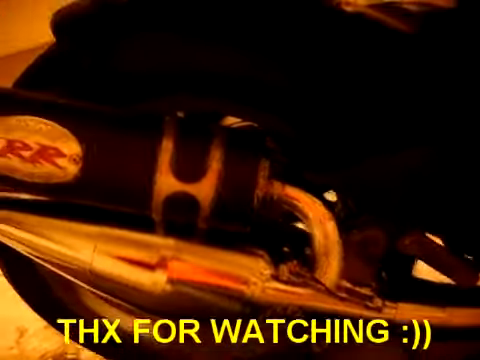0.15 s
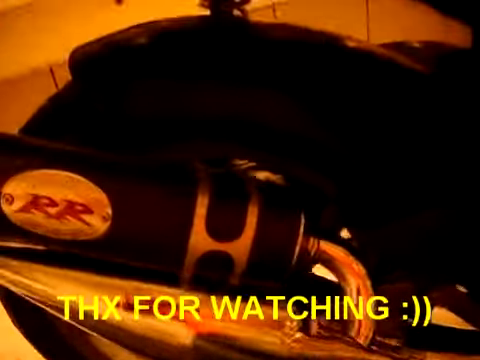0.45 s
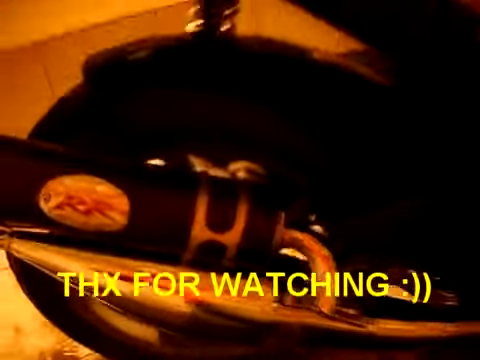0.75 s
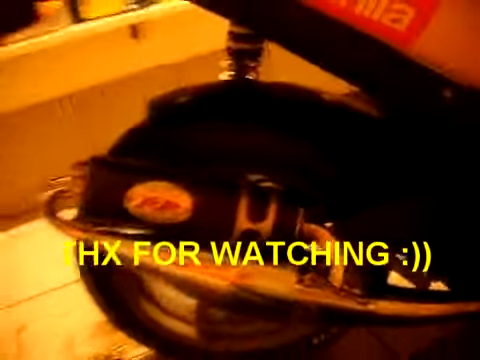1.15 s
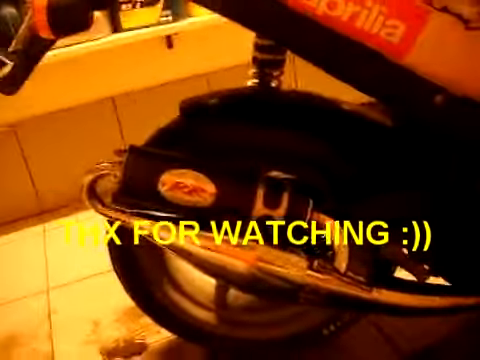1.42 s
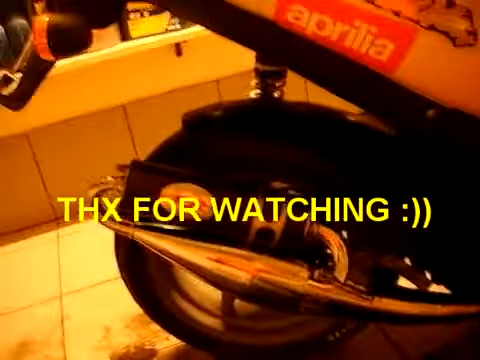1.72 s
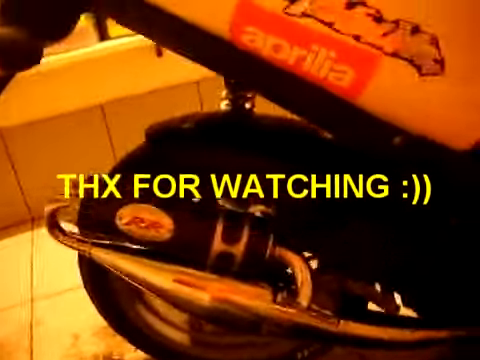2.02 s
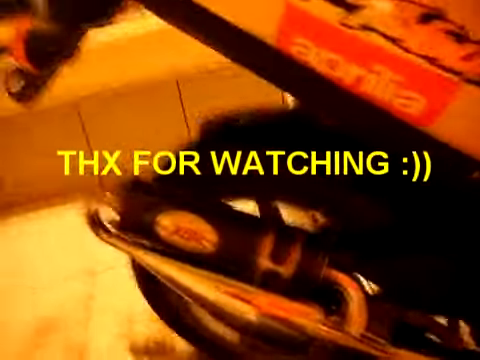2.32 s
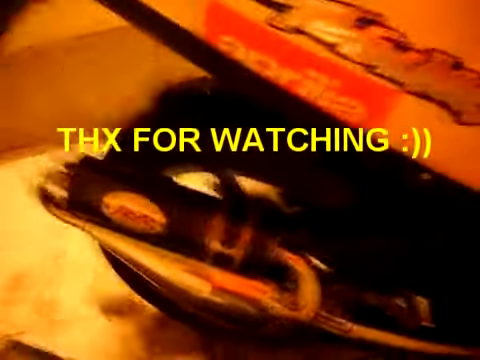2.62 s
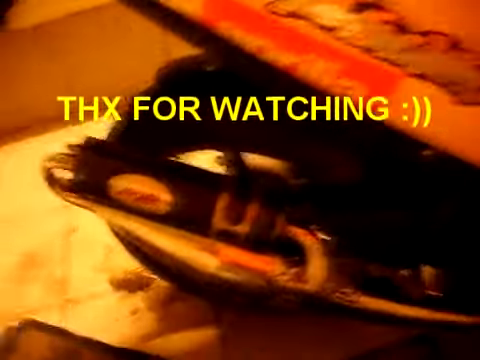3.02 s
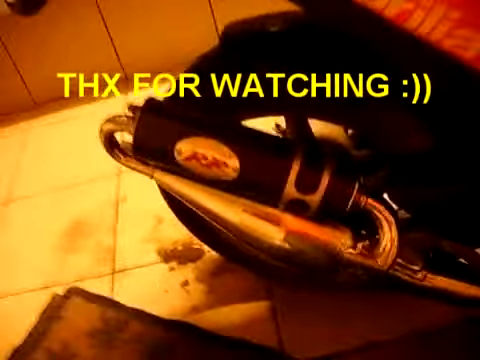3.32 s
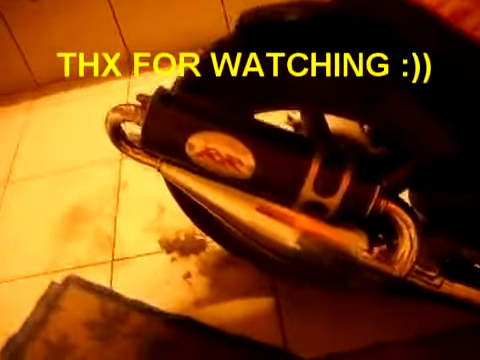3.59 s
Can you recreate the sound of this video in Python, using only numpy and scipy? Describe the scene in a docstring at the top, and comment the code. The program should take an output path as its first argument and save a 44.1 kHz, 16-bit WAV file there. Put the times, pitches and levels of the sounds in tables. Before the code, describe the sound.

A small two-stroke scooter drops from a short rev to an uneven idle, its exhaust popping and puffing with fine metal clatter, heard very close over a hard tiled floor with short reflections.

```python
"""Small scooter settling to idle

A small two-stroke scooter settles from a blip to a lumpy idle, close by, over a tiled floor.
Every turn of the crank puffs into the exhaust, ringing its pipe, but only every second to fourth turn
fires with a full pop. Filtered noise makes the gas that rumbles, rasps, hums and whistles in the silencer.
Dying sines make the piston's knocks and the ticks of loose metal; the loudest pops overload the microphone."""
import sys
import numpy as np
from scipy import signal
from scipy.io import wavfile
from scipy.ndimage import uniform_filter1d

SR = 44100
rng = np.random.default_rng(int(sys.argv[2]) if len(sys.argv) > 2 else 0)


def digitize_waveform(pressure):
    """Quantize a signal to 16-bit integers and store it at the path in sys.argv[1].

    Rows of a 2-D input are taken as channels; values are limited to [-1, 1].
    """
    field = np.atleast_2d(pressure).T
    bounded = np.clip(field, -1, 1)
    quanta = np.round(bounded * 32767).astype(np.int16)
    wavfile.write(sys.argv[1], SR, quanta)


N = 165375  # length in samples

# full firings of the engine: start_s [s], level_db [dB], turns_to_next [crank turns until the next firing]
FIRING_TIMES = [(0.0103, -8, 3), (0.0996, -2.5, 3), (0.1771, 4, 4), (0.2934, -0.5, 4), (0.4169, -1, 4),
                (0.5487, -1, 4), (0.6903, 2.5, 4), (0.8414, -5.5, 4), (0.9969, 1, 3), (1.1217, -8, 3),
                (1.2589, -8, 2), (1.3586, -2.5, 2), (1.4564, -2, 2), (1.5596, -5, 2), (1.6607, 3, 3),
                (1.8101, -3.5, 4), (2.0014, 1.5, 3), (2.152, -9, 2), (2.2436, -1, 2), (2.3403, -4.5, 3),
                (2.490, -0.5, 3), (2.6317, -1.5, 3), (2.7717, -3.5, 3), (2.9093, -5, 2), (3.0068, -1.5, 3),
                (3.1512, -7, 3), (3.2976, -9, 4), (3.4902, -2, 3), (3.6395, -0.5, 3), (3.788, -3, 1)]


def amp(db):
    """Turns decibels into a gain."""
    return 10 ** (np.asarray(db) / 20)


def unit(x):
    """Scales a sound to rms 1."""
    return x / np.sqrt(np.mean(x ** 2) + 1e-20)


def add(mix, s, sound):
    """Mixes a sound in at time s, in seconds."""
    at = round(s * SR)
    sound = sound[max(-at, 0):]
    part = mix[max(at, 0):][:len(sound)]
    part += sound[:len(part)]


def colour(x, points):
    """Gives a sound the wanted spectrum with a filter that never sounds early; the result has rms 1."""
    points_hz, points_db = np.transpose(points)
    size = 8192
    hz = abs(np.fft.fftfreq(size, 1 / SR))
    gain_db = np.interp(np.log(hz + 1), np.log(points_hz), points_db)
    # the Hilbert transform of the log gain gives the phase of a minimum-phase filter
    log_spectrum = signal.hilbert(np.log(amp(gain_db))).conj()
    taps = np.fft.ifft(np.exp(log_spectrum)).real[:size // 2]
    return unit(signal.fftconvolve(x, taps)[:N])


def resonate(x, hz, width_hz):
    """One resonance: each sample sets off a dying sine; the result has rms 1."""
    t = np.arange(SR // 2) / SR
    response = np.exp(-np.pi * width_hz * t) * np.sin(2 * np.pi * hz * t)
    return unit(signal.fftconvolve(x, response)[:N])


def ring(modes, scatter_db, detune, attack_s):
    """Struck metal or a pulsed pipe: dying sines, with level and pitch a little different each time."""
    t = np.arange(SR // 4) / SR
    onset = 1 - np.exp(-(t / attack_s) ** 2)
    out = np.zeros(len(t))
    for hz, db, t60_s in modes:
        size = amp(db + scatter_db * rng.standard_normal())
        decay = np.exp(-np.log(1000) * t / t60_s)
        pitch_hz = hz * (1 + detune * rng.standard_normal())
        out += size * decay * np.sin(2 * np.pi * pitch_hz * t)
    return onset * out


def bursts(turns, lead_s, rise_s, fall_s, base, scatter_db, fired_db, next_db):
    """One swell per turn over a steady base; the fired turn and the one after it have their own strength."""
    t, out = np.arange(N) / SR, np.zeros(N)
    for s, k in turns:
        near = slice(max(int(s * SR) - SR // 10, 0), int(s * SR) + SR // 10)
        since_peak = t[near] - s + lead_s
        size = amp(scatter_db * rng.standard_normal() + fired_db * (k == 0) + next_db * (k == 1))
        out[near] += size * np.exp(-np.maximum(-since_peak / rise_s, since_peak / fall_s))
    return out + base


def grains(per_s, spread_db):
    """Dense random clicks of uneven size, scaled to rms 1."""
    sizes = amp(spread_db * np.minimum(rng.exponential(1, N), 4))
    present = rng.random(N) < per_s / SR
    return unit(rng.standard_normal(N) * sizes * present)


def level(s, order):
    """Gain at time s, from one column of levels, as the engine slows and the microphone draws back."""
    # overall levels: start_s [s], puffs_db [dB], rasp_db [dB], clatter_db [dB]; puffs_db also sets the rumble
    rows = np.array([(0, 2, 7, 3.5), (0.252, 1, 6, 5.5), (0.55, 4.5, 7, 4), (0.721, 3, 4, 3),
                     (.87, 2, 4.5, 1), (1.2, -3, 1, -0.5), (1.43, -1, 4, -0.5), (1.601, -2.5, 1, 0),
                     (2.099, -1, 2.5, 1.5), (2.652, -3.5, 2, -0.5), (3.202, -2.5, 1, 1.5), (3.75, -3, 1, 1)])
    return amp(np.interp(s, rows[:, 0], rows[:, order]))


def crank():
    """Lists every crank turn before the last firing as (s, turns since a firing), spaced almost evenly."""
    jitter_s = .0002
    turns = []
    for (start, _, count), (end, _, _) in zip(FIRING_TIMES, FIRING_TIMES[1:]):
        count = int(round(count))
        for k in range(count):
            jitter = (k > 0) * jitter_s * rng.standard_normal()  # the firings stay exactly in place
            turns.append((start + (end - start) * k / count + jitter, k))
    return turns


def exhaust(turns):
    """A pressure pulse rings the pipe: a full pop at a firing, else a puff, stronger just after a firing."""
    # ways the exhaust pipe rings: pitch_hz [Hz], firing_db [dB], puff_db [dB], t60_s [s to fall by 60 dB]
    pipe = np.array([(46, -31, -42, 0.034), (72.9, -25, -36, 0.74), (109.46, -27, -17.5, 0.28),
                     (131.24, -14.5, -23.5, 0.35), (154, -12, -29, 0.07), (243.5, -27.5, -36.5, 0.28),
                     (360, -36, -41.5, 0.059)])
    pop_modes, puff_modes = pipe[:, [0, 1, 3]], pipe[:, [0, 2, 3]]
    lead_s, rise_s, scatter_db, after_firing_db = 0.002, 0.00083, 1, 1.5
    out = np.zeros(N)
    for s, db, _ in FIRING_TIMES:
        pop = ring(pop_modes, scatter_db, detune=0.0027, attack_s=rise_s)
        add(out, s - lead_s, -amp(db) * pop)
    for s, k in turns:
        if k:
            puff = ring(puff_modes, scatter_db, detune=0.016, attack_s=rise_s)
            add(out, s - lead_s, -level(s, order=1) * amp(after_firing_db * (k == 1)) * puff)
    return out


def gas(turns):
    """Turbulent gas leaves in gusts: a rumble, a rasp, and the silencer's hum and whistle."""
    gust = bursts(turns, lead_s=0.00067, rise_s=0.014, fall_s=0.021, base=0.99,
                  scatter_db=1, fired_db=5.0, next_db=5.0)
    return gas_rumble(gust) + gas_rasp(turns, gust) + silencer_hum(gust) + silencer_whistle(turns)


def gas_rumble(gust):
    """The low roar of the flow: noise that swells with the gusts."""
    # spectrum of the rumble: pitch_hz [Hz], level_db [dB per Hz]
    spectrum = [(10, -13.5), (30, -9.5), (55, -12.5), (85, -11), (108, 5), (130, 5.5), (165, -1.5),
                (300, -7), (400, -14.5), (520, -19.5), (5000, -90)]
    rumble = colour(rng.standard_normal(N) * gust, spectrum) * amp(-21.5)
    return rumble * level(np.arange(N) / SR, order=1)


def gas_rasp(turns, gust):
    """The rough edge of the flow: random grains mixed with chuffs that repeat on every turn."""
    # spectrum of the rasp: pitch_hz [Hz], level_db [dB per Hz]
    spectrum = [(200, -5), (400, -2.5), (530, 0), (600, 3.5), (740, 5.5), (820, -3), (1180, 0),
                (1400, -4.5), (1600, -12), (1780, -10.5), (2100, -19.5), (4000, -24.5), (8500, -60)]
    t = np.arange(N) / SR
    revving, idle, settled_s = 1.0, 0.32, .9
    regular = np.interp(t, [0, settled_s], [revving, idle])  # the rasp is more regular at speed
    rough = unit(grains(per_s=5600, spread_db=2.0) * gust)
    mixed = (rough + regular * chuffs(turns)) / np.hypot(1, regular)
    return colour(mixed, spectrum) * amp(-35) * amp(-0.5) * level(t, order=2)


def chuffs(turns, lead_s=0.0037, fall_s=0.013, fired_db=3):
    """The opening port sends the same scatter of echoes through the baffles on every turn."""
    t, out = np.arange(SR // 20) / SR, np.zeros(N)
    baffles = rng.standard_normal(len(t)) * np.exp(-t / fall_s)
    for s, k in turns:
        add(out, s - lead_s, amp(fired_db * (k == 0) + rng.standard_normal()) * baffles)
    return unit(out)


def silencer_hum(gust):
    """The gusting flow blows two resonances of the silencer, each with its own slow swell."""
    # the silencer's resonances: pitch_hz [Hz], width_hz [Hz], level_db [dB before the swell]
    resonances = [(249.4, 10, -32.5), (330, 27, -40.5)]
    # swell of the hum: start_s [s], low_tone_db [dB], high_tone_db [dB]
    hum_swell = [(0, -4, 10.5), (0.381, 7.5, 8.5), (0.461, 14.5, 11), (.56, 13, -16), (.64, 0.5, 4),
                 (1.801, 0.5, 2.5), (2.6, -3, 11.5), (3.2, 9, 9.5), (3.75, 1.5, 13.5)]
    t = np.arange(N) / SR
    flow = rng.standard_normal(N) * gust
    times, *swells = np.transpose(hum_swell)
    hum = np.zeros(N)
    for (hz, width_hz, db), swell in zip(resonances, swells):
        hum += amp(db + np.interp(t, times, swell)) * resonate(flow, hz, width_hz)
    return hum


def silencer_whistle(turns):
    """A wavering tone blown in the silencer surges on every turn."""
    # level of the whistle: start_s [s], level_db [dB]
    whistle_level = [(0, -31), (.32, -30), (.37, -41), (.9, -34), (1.5, -48.5), (2.55, -35.5), (3.2, -40),
                     (3.75, -39)]
    surge = bursts(turns, lead_s=0, rise_s=.008, fall_s=.025, base=.1, scatter_db=4, fired_db=3, next_db=0)
    level_db = np.interp(np.arange(N) / SR, *np.transpose(whistle_level))
    return unit(tone(hz=664) * surge) * amp(level_db)


def tone(hz):
    """A blown resonance: a sine that wavers a little in pitch."""
    wander_hz, wander_s = 13, .012  # rms size of the wavering, and the time it is smoothed over
    count = int(wander_s * SR)
    smooth = uniform_filter1d(uniform_filter1d(rng.standard_normal(N), count), count)
    return np.sin(2 * np.pi * np.cumsum(hz + wander_hz * unit(smooth)) / SR)


def clatter(turns):
    """Moving parts rattle finely on every turn: dense grains that swell with the shaking."""
    # spectrum of the clatter: pitch_hz [Hz], level_db [dB per Hz]
    spectrum = [(700, -8.5), (1500, 0), (2250, 5), (2600, 10.5), (3000, 5.5), (3350, -1.5), (4100, -14),
                (4950, -5.5), (5450, -22), (6200, -15), (6800, -26.5), (7700, -31.5), (8400, -27.5)]
    shake = bursts(turns, lead_s=0.014, rise_s=0.00081, fall_s=0.032, base=0.24,
                   scatter_db=0, fired_db=5.0, next_db=3)
    rattle = colour(grains(per_s=2500, spread_db=1.5) * shake, spectrum) * amp(-46)
    return rattle * level(np.arange(N) / SR, order=3)


def spit(turns):
    """A sharp burst of crackling grains on the turn after each firing."""
    # spectrum of the spit: pitch_hz [Hz], level_db [dB per Hz]
    spectrum = [(400, 3), (1300, 24.5), (2100, 5), (3000, 9), (4600, -0.5), (5500, -14), (6400, -12.5),
                (7200, -21), (8400, -24)]
    after = [(s, k) for s, k in turns if k == 1]
    jet = bursts(after, lead_s=0.0014, rise_s=.002, fall_s=0.0075, base=0,
                 scatter_db=1, fired_db=0, next_db=0)
    crackle = grains(per_s=5000, spread_db=1)
    return colour(crackle * jet, spectrum) * amp(-46)


def metal(turns):
    """The piston rings the cylinder with a soft knock around 16 ms before each puff, and sometimes a hard one."""
    # hard piston knocks: start_s [s], level_db [dB before the gain below]
    hard_knocks = [(0.063, -25), (0.173, -27), (0.2867, -26.5), (0.414, -26), (0.5035, -28.5),
                   (0.826, -21.5), (0.9851, -24), (1.2448, -25), (1.398, -23.5), (1.7388, -28),
                   (1.7958, -19), (1.8906, -25), (2.2254, -26.5), (2.325, -28.5), (2.9973, -24),
                   (3.0858, -29.5), (3.1797, -27), (3.2268, -27.5), (3.283, -26), (3.474, -27),
                   (3.519, -26), (3.5768, -23.5), (3.6261, -22.5), (3.7206, -22.5)]
    # ways the cylinder rings: pitch_hz [Hz], level_db [dB], t60_s [s to fall by 60 dB]
    cylinder = [(1750, -11, 0.072), (2600, -7, 0.098), (2692, 2.5, 0.021), (2810, -10.5, 0.024),
                (2977, -8.5, 0.069), (4910, -24.5, 0.043), (8100, -33.5, 0.031)]
    hard_gain_db, soft_db, lead_s = -3, -37.5, 0.016
    out = np.zeros(N)
    for s, db in hard_knocks:
        knock = ring(cylinder, scatter_db=2, detune=0.013, attack_s=0.0021)
        add(out, s, amp(db + hard_gain_db) * knock)
    for s, _ in turns:
        late, size = rng.standard_normal(2)
        knock = ring(cylinder, scatter_db=3, detune=.03, attack_s=.003)
        add(out, s - lead_s + 0.0035 * late, amp(soft_db + 2 * size) * knock)
    return out


def ticks():
    """A loose metal part close to the microphone ticks, short and dry: two quickly dying sines."""
    # ticks of the loose part: start_s [s], level_db [dB before the gain below]
    tick_times = [(0.5014, -59), (1.0051, -57), (1.2087, -57), (2.152, -67), (2.2525, -65), (2.3501, -66),
                  (2.3994, -59), (2.4972, -57), (2.7781, -61), (2.869, -59.5), (2.9168, -61), (3.016, -59),
                  (3.1592, -55.5), (3.181, -61), (3.2555, -59), (3.3049, -55), (3.4018, -62.5),
                  (3.499, -67)]
    # ways the part rings: pitch_hz [Hz], level_db [dB], t60_s [s to fall by 60 dB]
    part_modes = [(4945, 7, .023), (6000, -2.5, 0.024)]
    gain_db = 11
    out = np.zeros(N)
    for s, db in tick_times:
        add(out, s, amp(db + gain_db) * ring(part_modes, scatter_db=1, detune=0.005, attack_s=0.0013))
    return out


def walls(x):
    """Short scattered echoes of all but the low sound, from the floor and a nearby wall."""
    echo_db, t60_s = -10, 0.31
    t = np.arange(SR // 3) / SR
    signs = rng.choice([-1., 1.], len(t))
    present = (rng.random(len(t)) < 2000 / SR) * (t > .004)  # about 2000 echoes a second, after 4 ms
    taps = signs * present * np.exp(-np.log(1000) * t / t60_s)
    bright = signal.sosfilt(signal.butter(2, 400, "high", fs=SR, output="sos"), x)
    return amp(echo_db) * signal.fftconvolve(bright, taps / np.linalg.norm(taps))[:N]


def scene():
    """All the engine's sounds follow one crank; the loose part ticks on its own, without echoes."""
    turns = crank()
    engine = exhaust(turns) + gas(turns) + clatter(turns) + spit(turns) + metal(turns)
    return (engine + walls(engine) + ticks())[None]


def record(dry):
    """The microphone drops the deepest bass and rounds off the highest peaks; then the treble is cut."""
    low_cut_hz, overload, edge_hz = 5.9, .45, 8600  # overload: the height that peaks cannot pass
    lean = signal.sosfilt(signal.butter(1, low_cut_hz, "high", fs=SR, output="sos"), dry)
    rounded = lean / (1 + (lean / overload) ** 8) ** (1 / 8)
    treble_cut = signal.firwin(511, edge_hz, window=("kaiser", 9), fs=SR)
    return signal.oaconvolve(rounded, treble_cut[None], "same")


dry = scene()
out = record(dry)
digitize_waveform(out)
```